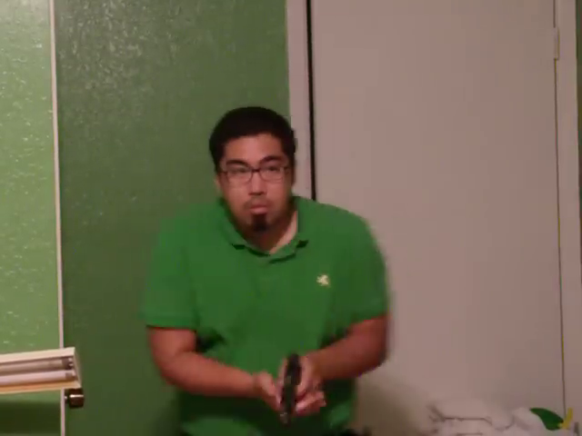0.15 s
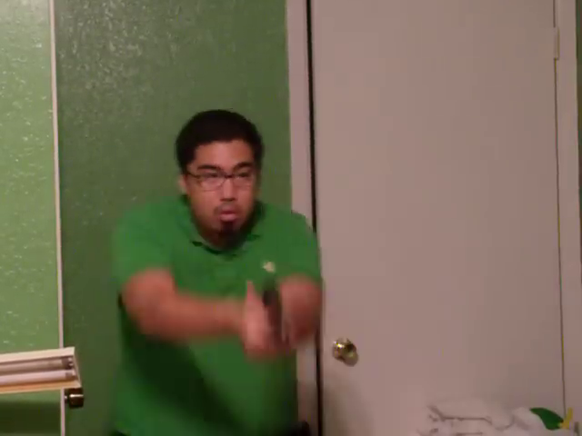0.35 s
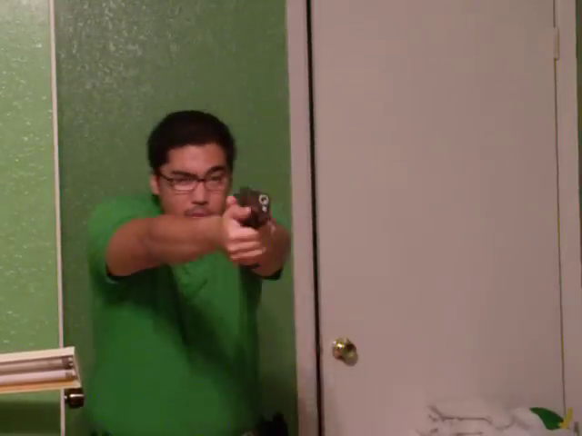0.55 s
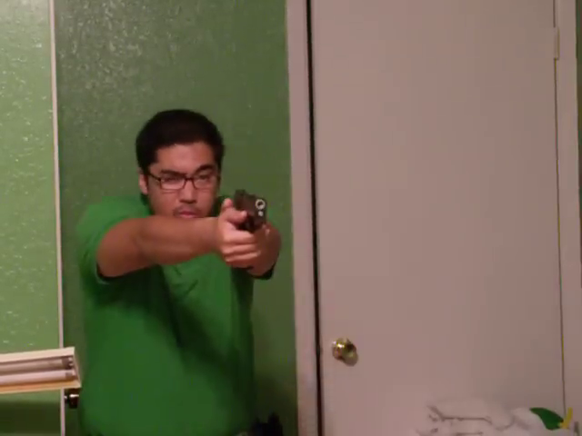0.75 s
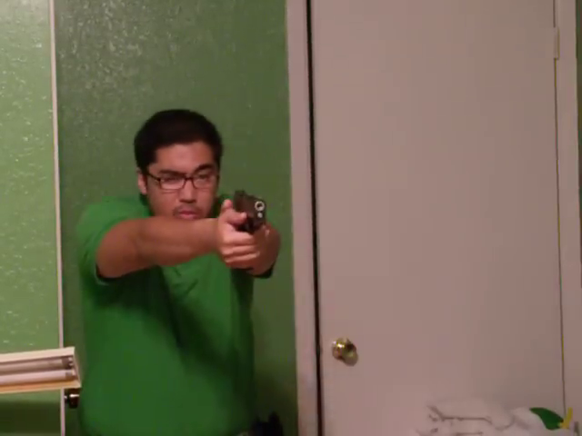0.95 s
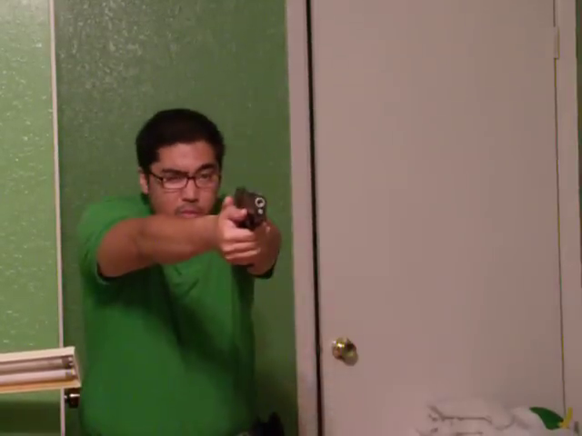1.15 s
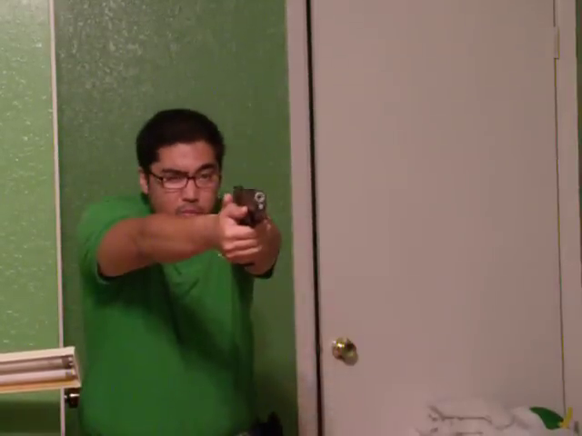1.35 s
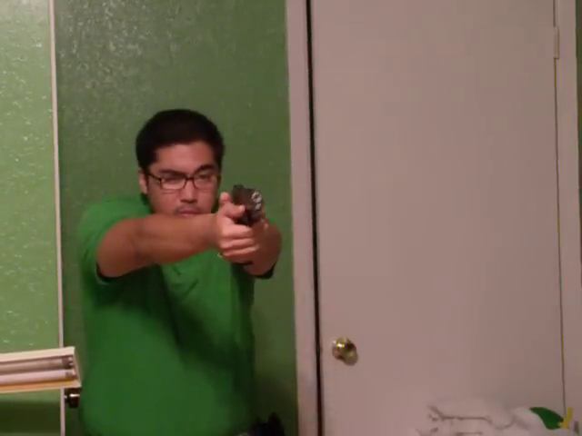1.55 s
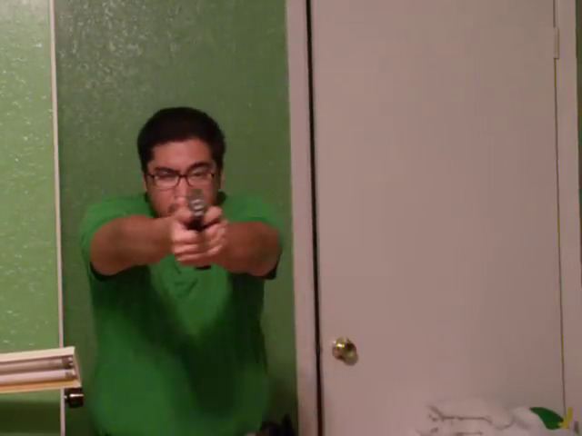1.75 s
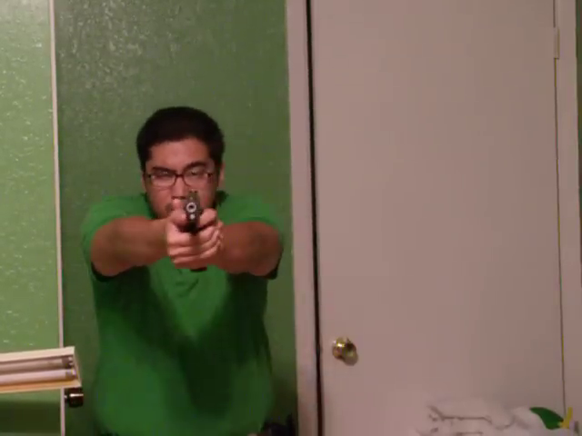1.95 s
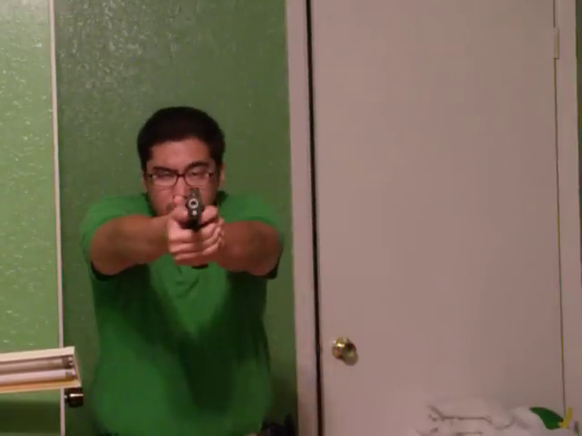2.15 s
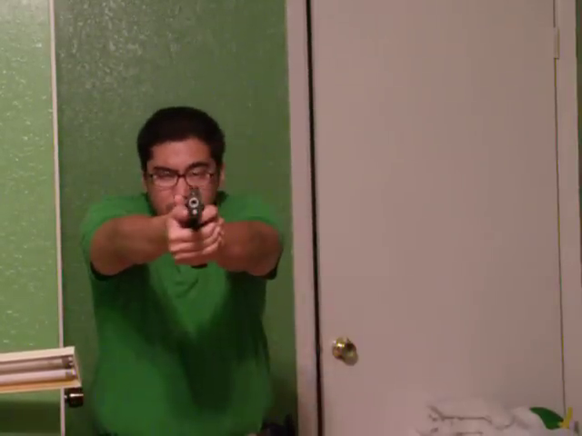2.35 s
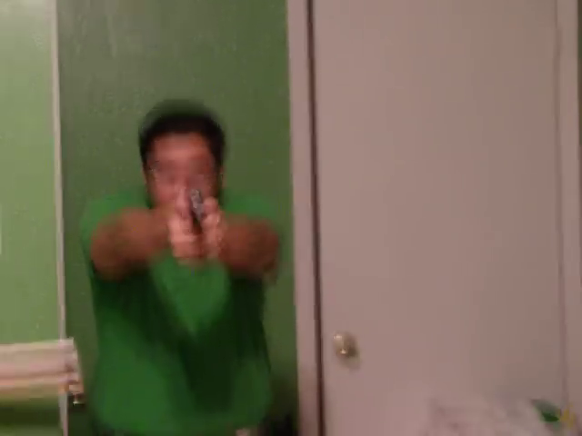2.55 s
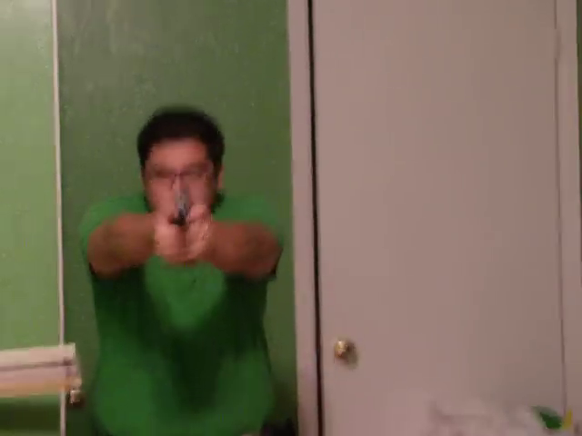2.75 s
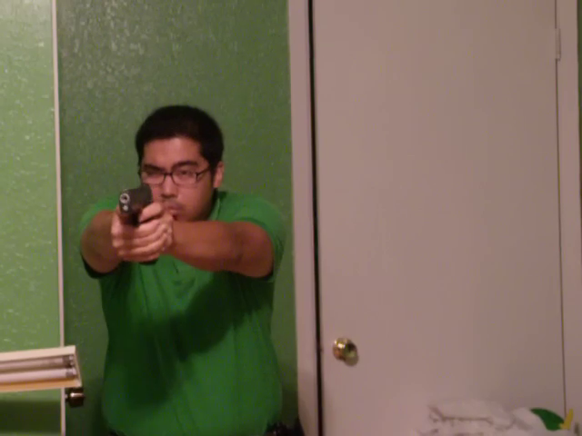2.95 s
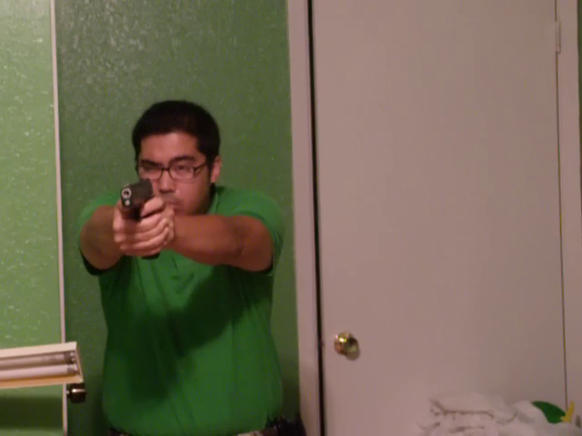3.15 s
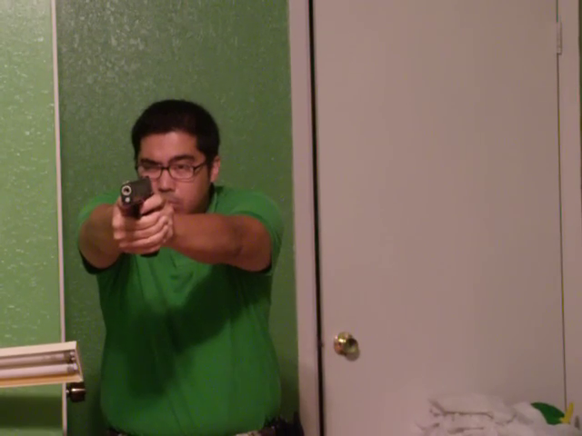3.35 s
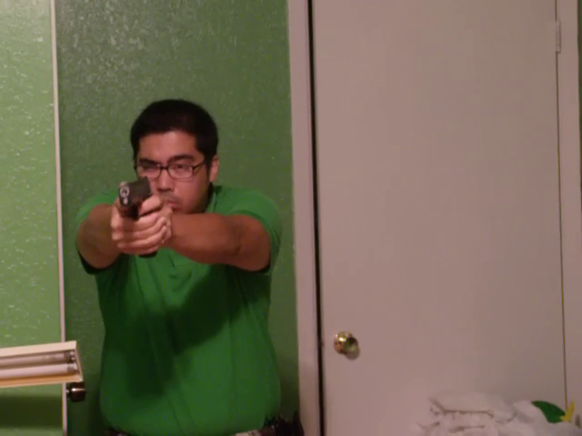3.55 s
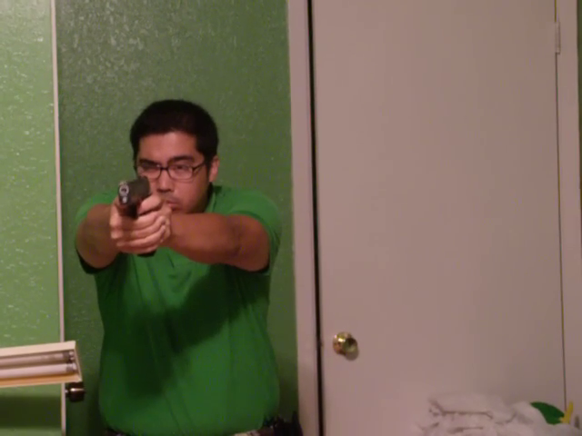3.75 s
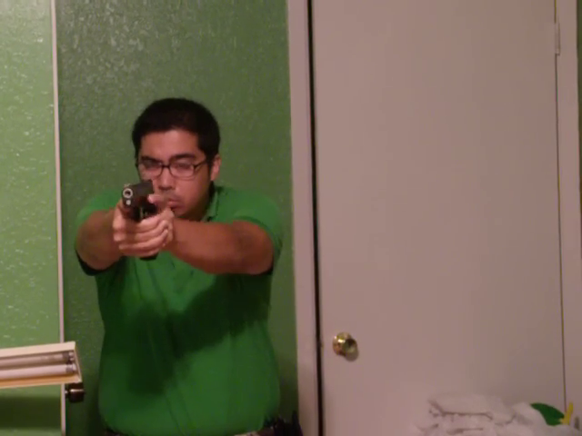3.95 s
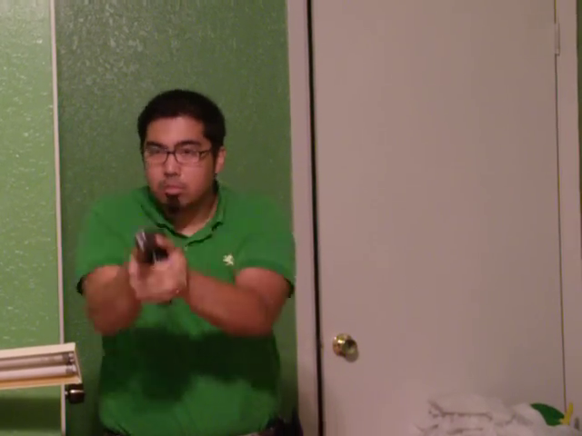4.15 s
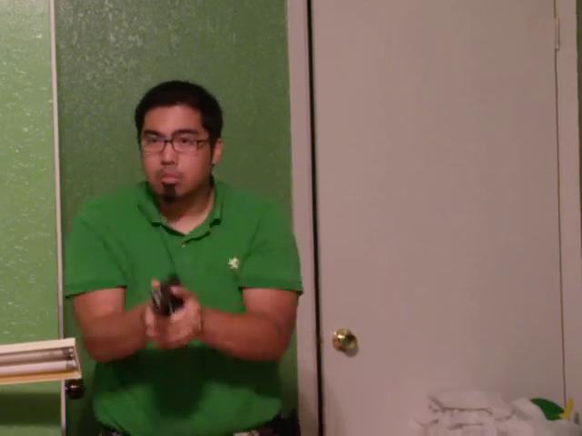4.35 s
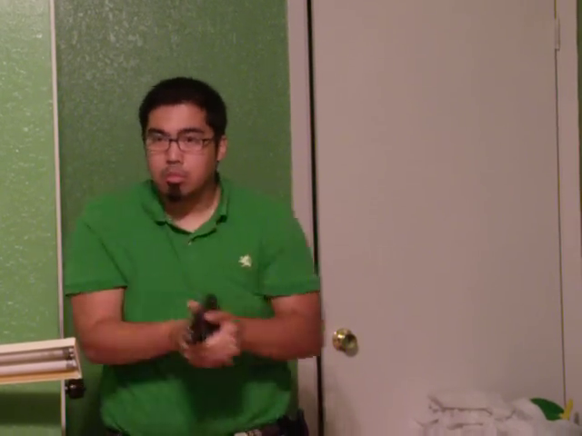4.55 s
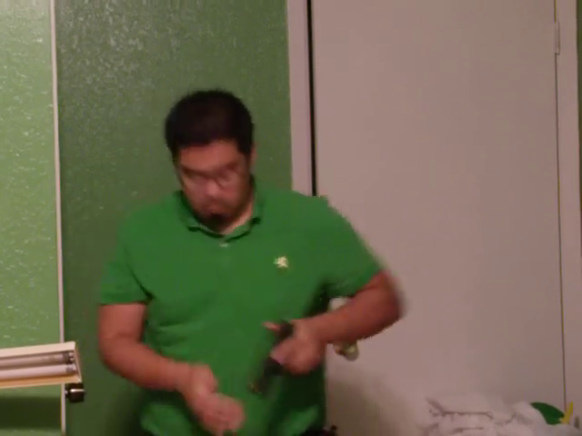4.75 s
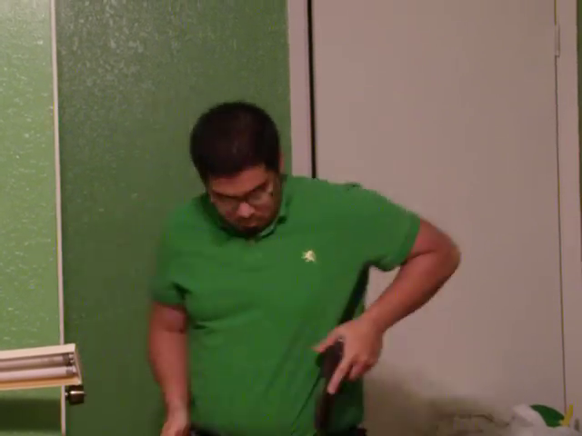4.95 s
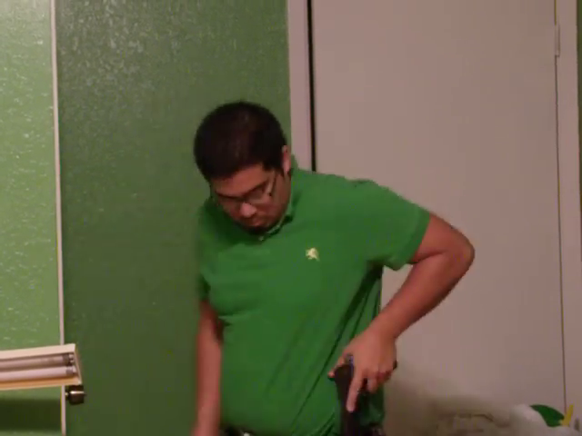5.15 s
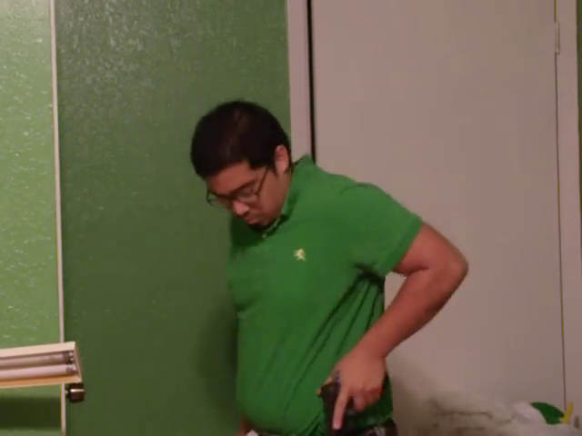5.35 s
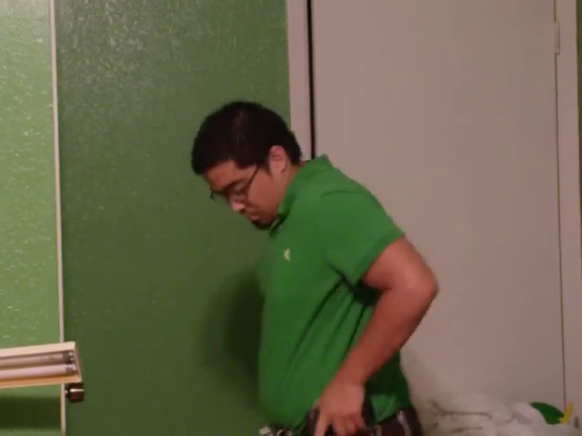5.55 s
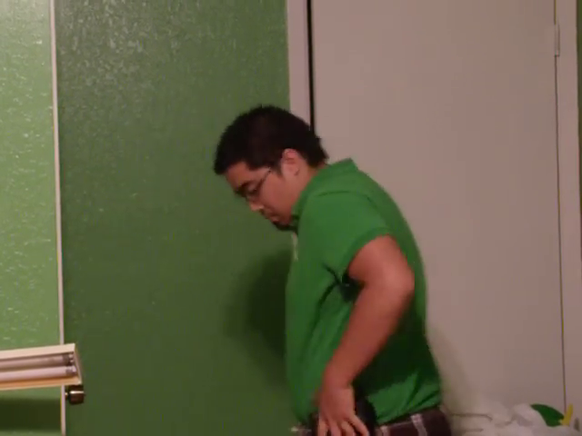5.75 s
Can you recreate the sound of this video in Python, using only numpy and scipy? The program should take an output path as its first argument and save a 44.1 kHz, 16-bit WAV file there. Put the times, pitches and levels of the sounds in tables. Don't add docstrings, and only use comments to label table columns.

```python
import sys
import numpy as np
from scipy import signal
from scipy.fft import rfft, irfft, next_fast_len
from scipy.io import wavfile
from scipy.ndimage import uniform_filter1d

SR = 44100
rng = np.random.default_rng(int(sys.argv[2]) if len(sys.argv) > 2 else 0)


def amplitude_ratio(level_db):
    exponent = np.asarray(level_db, float) / 20
    return 10 ** exponent


def dump_mix(stems):
    frames = np.atleast_2d(stems).T
    limited = np.clip(frames, -1, 1)
    pcm = np.round(limited * 32767).astype(np.int16)
    wavfile.write(sys.argv[1], SR, pcm)


N = 255383
SECONDS = np.arange(N) / SR

# start_s, gas_db, slide_travel_s, home_delay_s, home_db
SHOTS = [
    (1.358, 7, 0.022, 0.1, -3),
    (1.534, 4, 0.03, 0.086, -4),
    (2.485, 3.5, 0.03, 0.08, -4),
    (2.647, -0.06, 0.026, 0.062, 0.5),
    (3.507, -1, 0.01754, 0.073, -5),
    (3.698, -2.5, 0.0181, .075, -6.5),
]
# start_s, peak_db, ring_hz, board_db (hollow board beneath), far_wall_db (its answer)
PELLETS = [
    (4.0741, -21, 955, -32, -25),
    (4.08, -20, 1510, -33, -31),
    (4.179, -23.5, 1150, -33.5, -30.5),
    (4.4339, -21, 1130, -32, -32),
    (4.5136, -21, 1060, -28.5, -30),
]
# start_s, peak_db, ring_hz, width_share (of the ring)
HOLSTER = [
    (0.779, -42, 990, .9),
    (4.999, -46, 1100, .8),
    (5.172, -50, 1400, .85),
    (5.216, -24, 1900, 0.99),
    (5.223, -25.5, 1820, .45),
    (5.248, -28, 1780, .4),
    (5.388, -34, 1300, 0.95),
    (5.604, -23, 2700, 0.79),
    (5.608, -34, 1600, 0.59),
    (5.625, -29.5, 2400, .6),
]


def rms_one(x):
    return x / np.sqrt(np.mean(x ** 2) + 1e-20)


def in_time(rows):
    s, *columns = np.transpose(rows)
    return [np.interp(SECONDS, s, column) for column in columns]


def at_hz(points, hz):
    table_hz, values = np.array(points)[:, 0], np.array(points)[:, 1]
    return np.interp(np.log(hz), np.log(table_hz), values)


def coloured(spectrum):
    size = next_fast_len(N)
    hz = np.maximum(np.arange(size // 2 + 1) * SR / size, 1)
    white = rfft(rng.standard_normal(size))
    return rms_one(irfft(white * amplitude_ratio(at_hz(spectrum, hz)), size)[:N])


def resonance(x, hz, width_hz):
    r = np.exp(-np.pi * max(width_hz, 5) / SR)
    zeros = [(1 - r * r) / 2, 0, (r * r - 1) / 2]
    poles = [1, -2 * r * np.cos(2 * np.pi * hz / SR), r * r]
    return signal.lfilter(zeros, poles, x + 1e-18)


def body(modes):
    white, out = rng.standard_normal(N), np.zeros(N)
    for k, (hz, width_hz, db) in enumerate(modes):
        out += (-1) ** k * amplitude_ratio(db) * resonance(white, hz, width_hz)
    return rms_one(out)


def bursts(times, levels_db, rise_s, t60):
    out, t = np.zeros(N), np.arange(SR // 3) / SR
    for s, db in zip(times, levels_db):
        at = round(s * SR)
        out[at:at + len(t)] += amplitude_ratio(db - 60 * t / t60) * (1 - np.exp(-t / rise_s))
    return out


def drift(rate_hz):
    slow = rng.standard_normal(int(N / SR * rate_hz) + 2)
    wander = np.interp(SECONDS * rate_hz, np.arange(len(slow)), slow)
    return rms_one(uniform_filter1d(wander, size=501))


def knocks(table, crack, rattle):
    out, t = np.zeros(N), np.arange(4000) / SR
    dull = signal.butter(2, 3200, fs=SR, output="sos")
    for (s, db, hz, width_hz, t60), white in zip(table, rng.standard_normal((len(table), 4000))):
        contacts = rattle * white * amplitude_ratio(-60 * t / max(t60, .003)) - (t == 0)
        ringing = resonance(resonance(contacts, hz, width_hz), hz, width_hz)
        knock = rms_one(ringing) + crack * rms_one(signal.sosfilt(dull, contacts))
        out[round(s * SR):][:4000] += amplitude_ratio(db) * knock / np.abs(knock).max()
    return out


def room(x, times, room_db, tilt_db):
    # centre_hz, t60_s
    room_t60 = [(60, 0.212), (120, 0.15), (250, 0.35), (500, 0.41), (1000, 0.51), (2000, 0.44),
                (4000, 0.39)]
    build_up_s = 0.0033
    late_db, late_stretch = -24.5, 2.52
    t, edges_hz = np.arange(SR * 3 // 4) / SR, 40 * 2 ** np.arange(0, 7.3, .6)
    white, tails = rng.standard_normal((2, len(times), len(t))), 0
    for k, (low, high) in enumerate(zip(edges_hz, edges_hz[1:])):
        band_pass = signal.butter(2, [low, high], "band", fs=SR, output="sos")
        band = signal.sosfilt(band_pass, white[k % 2])
        fall_db = -60 * t / at_hz(room_t60, np.sqrt(low * high))
        decay = amplitude_ratio(fall_db) + amplitude_ratio(late_db + fall_db / late_stretch)
        tilt = amplitude_ratio(tilt_db * np.log2(np.clip(low, 300, 4000) / 1500))
        tails = tails + band * decay * tilt
    tails = tails * (1 - np.exp(-(t / build_up_s) ** 2))
    out = x.copy()
    starts = [round((s - .01) * SR) for s in times] + [N]
    for start, end, tail in zip(starts, starts[1:], tails):
        wet = signal.fftconvolve(x[start:end], tail / np.sqrt(np.sum(tail ** 2)))[:N - start]
        out[start:start + len(wet)] += amplitude_ratio(room_db) * wet
    return out


def background():
    # time_s, level_db
    floor = [(0, -41), (.5, -42), (1.35, -41.5), (2.1, -45), (3.2, -46.5), (5.79, -48)]
    # freq_hz, density_db (per Hz)
    rumble_colour = [(2, -7), (8, 0), (22, 5), (45, -6.5), (65, -14.5), (90, -9), (130, -13.5), (200, -18),
                     (400, -49)]
    # freq_hz, density_db (per Hz)
    hiss_colour = [(80, -36.5), (150, -3), (230, 3), (400, -2.5), (900, -0.5), (1500, -1), (2200, -5),
                   (3200, -6.5), (6000, -14)]
    # pitch_hz, level_db (rms)
    lines = [(59.2, -57), (118.4, -58.5), (220.7, -58.5), (796.7, -61), (995.9, -73)]
    hiss_db, = in_time(floor)
    rumble_db = np.minimum(-40 + 1.52 * (hiss_db + 42), -41.5)
    rumble_db = rumble_db + 0.8 * drift(3.17) + 1.2 * drift(25)
    rumble = amplitude_ratio(rumble_db) * coloured(rumble_colour)
    hiss = amplitude_ratio(hiss_db + 0.6 * drift(20)) * coloured(hiss_colour)
    hum = np.zeros(N)
    for hz, db in lines:
        hum += amplitude_ratio(db + 1.0 + 3.0 * drift(17)) * np.sin(2 * np.pi * hz * SECONDS)
    return rumble + hiss + hum * amplitude_ratio(hiss_db - hiss_db[SR])


def draw():
    # time_s, scrape_db
    pull = [(0.072, -41.5), (0.126, -33.5), (0.174, -28), (0.212, -27.5), (0.246, -29.5), (0.276, -29),
            (0.336, -37), (0.45, -36)]
    # mode_hz, width_hz, level_db
    cavity_modes = [(226.7, 9.8, 12), (362, 30, 3.5), (468, 67, 2.5), (650, 140, -4)]
    # freq_hz, density_db (per Hz)
    scrape_colour = [(300, -31), (600, -6), (900, -1), (1900, -1), (2600, -2.5), (3600, -2.5), (6000, -4.5)]
    scrape_db, = in_time(pull)
    grab = amplitude_ratio(-23.5 - 60 * SECONDS / 0.27)
    scrape = (amplitude_ratio(scrape_db) + grab) * coloured(scrape_colour)
    cavity_db = -35.5 + 1.84 * (scrape_db + 28.5)
    rim_bump = bursts([0.202], [-26.5], .004, 0.11)
    cavity = (amplitude_ratio(cavity_db) + rim_bump) * body(cavity_modes)
    tone = amplitude_ratio(cavity_db - 4) * np.sin(2 * np.pi * cavity_modes[0][0] * SECONDS)
    moving = np.clip((pull[-1][0] - SECONDS) / 0.066, 0, 1)
    jerks = amplitude_ratio(1.0 * drift(64.4))
    return moving * jerks * (scrape + cavity + tone)


def holster():
    rows = []
    for s, db, hz, share in HOLSTER:
        rows.append((s, db, hz, share * hz, .045))
        rows.append((s + .004, db - 6.5, 1090, 650, .06))
    return knocks(rows, crack=.55, rattle=.36)


def settling():
    start_s, gap_s, shrink = 3.0, .055, .89
    times = start_s + gap_s * np.array([0, 1, 1 + shrink])
    rows = [(s, -33 - k * 2.5, 420, 250, 0.029) for k, s in enumerate(times)]
    return knocks(rows, crack=0.5, rattle=0.17)


def pellets():
    width_share = 0.88
    rows = []
    for s, db, hz, board_db, wall_db in PELLETS:
        rows.append((s, db, hz, width_share * hz, 0.019))
        rows.append((s + 0.0028, board_db, 470, 380, 0.055))
        rows.append((s + .02, wall_db, 1.42 * hz, width_share * hz, 0.046))
    return knocks(rows, crack=0.44, rattle=0.12)


def recoil():
    # mode_hz, width_hz, level_db
    hand_modes = [(283, 65, 2.5), (318, 110, 0), (488, 300, 1), (583, 102, 2), (798, 59, -8)]
    s, pop_db = np.transpose(SHOTS)[:2]
    thud = body(hand_modes) * bursts(s + 0.0044, pop_db - 6.5, 0.012, 0.31)
    push = bursts(s, pop_db - 27, 0.0032, 0.097) - bursts(s + 0.01, pop_db - 28.5, 0.0073, 0.13)
    return thud - push


def muzzle():
    crack_s, over_pop_db = .0008, 2
    out, shape = np.zeros(N), np.linspace(1, -1, max(round(crack_s * SR), 4))
    for s, pop_db in np.array(SHOTS)[:, :2]:
        out[round(s * SR):][:len(shape)] += amplitude_ratio(pop_db + over_pop_db) * shape
    return out


def pistol():
    # freq_hz, density_db (per Hz)
    gas_colour = [(15, -8), (40, 11), (80, 8.5), (150, -2.5), (300, 2.5), (700, 0.5), (1500, 0),
                  (2600, 6.5), (3600, 8), (6000, -5.5)]
    # mode_hz, width_hz, level_db
    frame_modes = [(526, 268, -2.5), (713, 160, 2), (1246, 284, -2.5), (2110, 840, -6), (3606, 880, -4.5)]
    # mode_hz, width_hz, level_db
    slide_modes = [(595, 300, -36.5), (1555, 225, 3), (2660, 2180, 0.5), (2980, 820, -10.5), (3570, 430, 0),
                   (4640, 1700, -1)]
    s, pop_db, travel_s, home_s, home_db = np.transpose(SHOTS)
    slam_db = pop_db + 1.44
    slide, frame, gas = body(slide_modes), body(frame_modes), coloured(gas_colour)
    hammer = slide * bursts(s - .0042, pop_db - 23.5, 0.00069, 0.028)
    pop = gas * bursts(s - .001, pop_db, 0.0016, 0.053)
    venting = gas * bursts(s + 0.0085, pop_db - 9.5, 0.012, 0.28)
    slam = frame * bursts(s + travel_s - .004, slam_db, 0.0016, 0.056)
    rebound = frame * bursts(s + travel_s + 0.02975, slam_db - 9, 0.0012, 0.025)
    home = slide * bursts(s + home_s - .006, home_db, 0.0031, 0.07)
    return hammer + pop + venting + slam + rebound + home


def scene():
    shots = room(pistol() + muzzle(), [row[0] for row in SHOTS], room_db=-1.6, tilt_db=1.48)
    small_times = [HOLSTER[0][0], PELLETS[0][0], PELLETS[3][0], HOLSTER[1][0]]
    small = room(pellets() + holster(), small_times, room_db=-3.5, tilt_db=1.4)
    board = room(settling(), [3.0], room_db=-9.5, tilt_db=-5.6)
    opening = np.minimum(SECONDS / .002, 1)
    return ((shots + small + board + recoil() + draw() + background()) * opening)[None]


def roll_off(x):
    return signal.sosfilt(signal.butter(12, 16670, fs=SR, output="sos"), x)


def record(dry):
    input_top, offset, full_scale = 0.63, -.0028, .705
    guard = signal.firwin(24 * 441 + 1, 1.05 / 441, window=("kaiser", 6.0))
    coarse = signal.resample_poly(dry, 80, 441, axis=1, window=guard)
    coarse = np.clip(coarse + offset, -input_top, input_top)
    smoothing = signal.firwin(32 * 441 + 1, 1 / 441, window=("kaiser", 9.0))
    fine = signal.resample_poly(coarse, 441, 80, axis=1, window=smoothing)[:, :N]
    overshoots_clipped = np.clip(fine, -full_scale, full_scale)
    top_cut = signal.ellip(10, .1, 50, 16050, fs=SR, output="sos")
    mix = signal.sosfilt(top_cut, overshoots_clipped)
    return roll_off(mix)


dry = scene()
out = record(dry)
dump_mix(out)
```